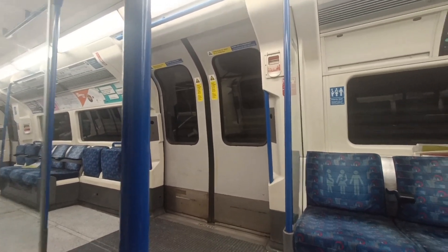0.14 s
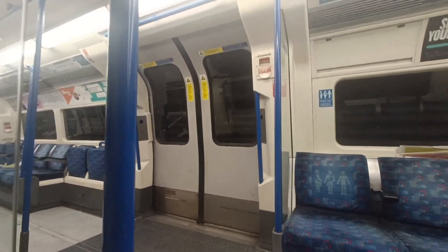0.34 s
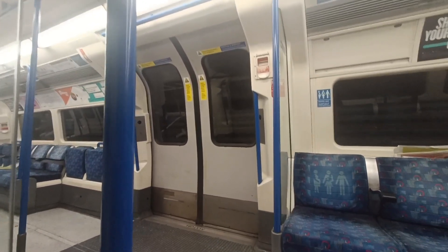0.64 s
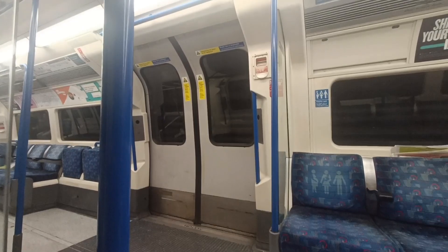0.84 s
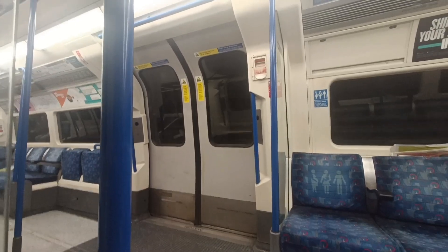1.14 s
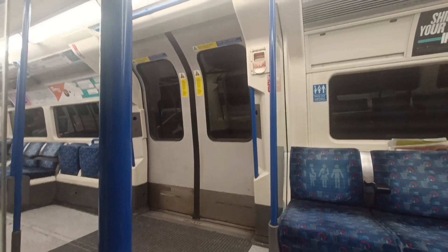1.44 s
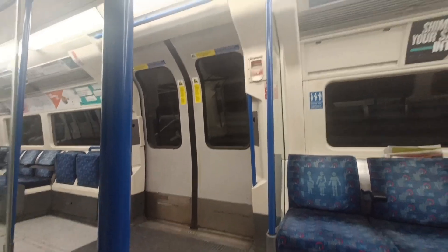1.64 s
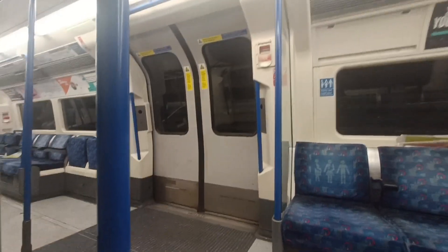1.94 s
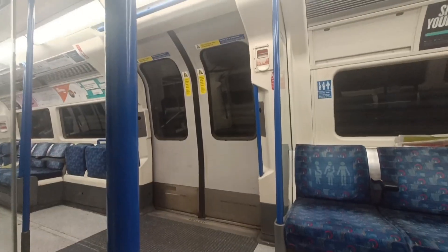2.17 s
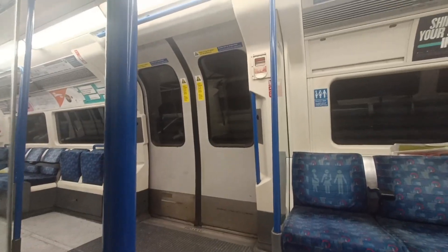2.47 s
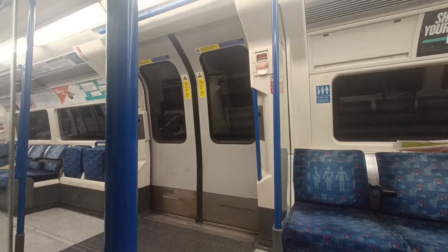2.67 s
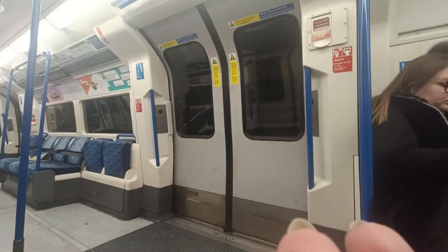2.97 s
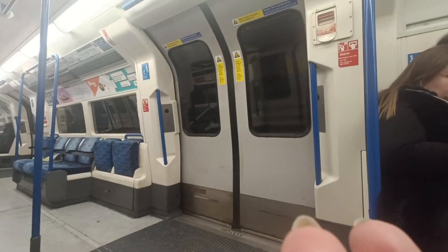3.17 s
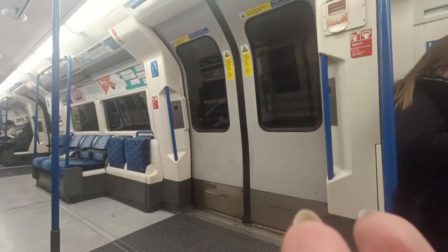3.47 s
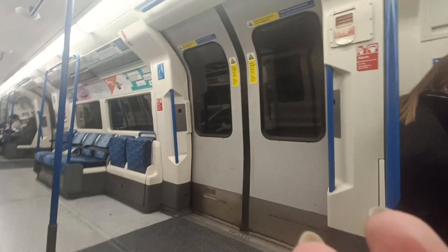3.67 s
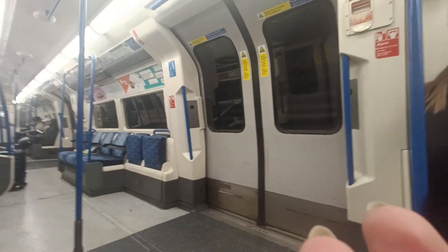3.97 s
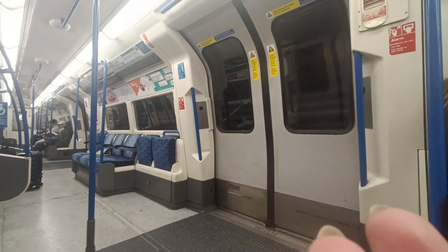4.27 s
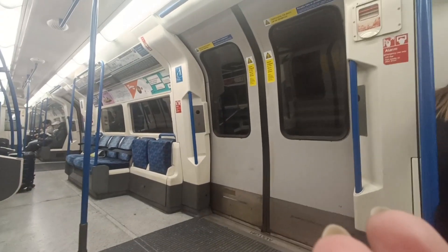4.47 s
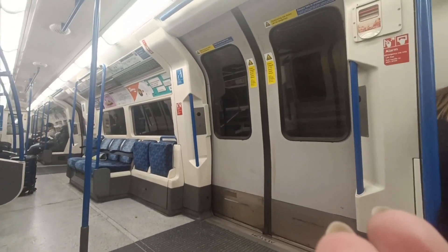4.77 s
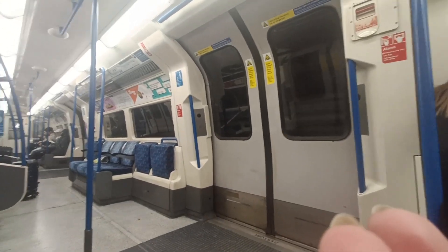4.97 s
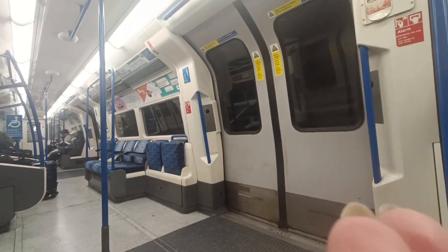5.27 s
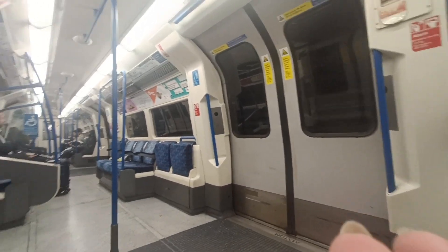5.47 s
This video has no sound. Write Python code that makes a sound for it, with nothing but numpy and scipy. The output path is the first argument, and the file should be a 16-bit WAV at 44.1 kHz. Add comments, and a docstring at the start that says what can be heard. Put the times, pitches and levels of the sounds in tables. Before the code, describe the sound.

A subway train booms and rumbles loudly through a tunnel, heard from inside the carriage. A gear whine slowly climbs while the wheels knock over rail joints and faintly scrape. The sound cuts to dead silence for half a second, then returns a little brighter, with loose door panels rattling and the wheels scraping and squealing toward the right. Near the end the wheels hum, and two small clicks come close on the left.

```python
"""An underground train booms, rumbles and roars through a tunnel, heard from inside as rough rail
shakes its wheels and body. There are two stretches of the ride, with dead silence between them.
In the first a gear whine slowly climbs; in the second the wheels squeal and hum, and something
clicks close by on the left. In both, rail joints knock, steel scrapes on the rail now and then,
and loose door panels rattle."""
import sys
import numpy as np
from scipy import signal
from scipy.fft import rfft, irfft, next_fast_len
from scipy.io import wavfile
from scipy.ndimage import uniform_filter1d, minimum_filter1d

SR = 44100
rng = np.random.default_rng(int(sys.argv[2]) if len(sys.argv) > 2 else 0)


def master_out(mix):
    """Clip the mix to full scale and print it as 16-bit PCM to the path in sys.argv[1]."""
    frames = np.transpose(np.atleast_2d(mix))
    ceiling = np.clip(frames, -1, 1)
    pcm = np.round(ceiling * 32767).astype(np.int16)
    wavfile.write(sys.argv[1], SR, pcm)


N = 247842
TIME = np.arange(N) / SR
FFT_SIZE = next_fast_len(N)
HZ = np.maximum(np.arange(FFT_SIZE // 2 + 1) * SR / FFT_SIZE, 1)
SIDES = np.array([[1], [-1]])   # left, right
FIRST, SECOND = 0, 1   # the two stretches


def from_db(db):
    """Turn decibels into a gain to multiply by."""
    return 10 ** (np.asarray(db) / 20)


def rms_one(x):
    """Scale a signal so that its average strength (rms) is 1."""
    return x / np.sqrt(np.mean(x ** 2) + 1e-20)


def over_time(rows):
    """Join the points of a table with lines: one curve for each column after the time."""
    times, *columns = np.transpose(rows)
    return [np.interp(TIME, times, column) for column in columns]


def over_frequency(points):
    """Join (frequency, value) points with lines, giving every octave equal room."""
    hz, value = np.transpose(points)
    return np.interp(np.log(HZ), np.log(hz), value)


def during(start_s, end_s):
    """1 between start and end, 0 outside, with abrupt edges."""
    return np.clip(np.minimum(TIME - start_s, end_s - TIME) / .001, 0, 1)


def envelope(start_s, length_s, attack_s, release_s):
    """Rise to 1 by the start time, hold, then die away."""
    early = np.maximum(start_s - TIME, 0)
    late = np.maximum(TIME - start_s - length_s, 0)
    return np.exp(-np.minimum((early / attack_s) ** 2 + late / release_s, 50))


def pan(balance_db):
    """Left and right gains with the same total power; a positive balance leans left."""
    gains = from_db(SIDES * balance_db / 2)
    return gains / np.sqrt(np.mean(gains ** 2, axis=0))


def white_spectra():
    """The spectra of two unrelated white noises."""
    return rfft(rng.standard_normal((2, FFT_SIZE)))


def drift(rate_hz):
    """A smooth random wander, about 1 in size; a higher rate wanders faster."""
    step, warm_up = 40, 1000
    keep = np.exp(-2 * np.pi * step * rate_hz / SR)
    noise = rng.standard_normal(N // step + warm_up + 2)
    slow = signal.lfilter([1], [1, -2 * keep, keep * keep], noise)[warm_up:]
    return np.interp(np.arange(N) / step, np.arange(len(slow)), rms_one(slow))


def band(low_hz, high_hz):
    """Gains that let through only the frequencies between low and high."""
    return ((1 + (low_hz / HZ) ** 12) * (1 + (HZ / high_hz) ** 12)) ** -.5


def resonance(hz, width_hz):
    """Gains that peak at 1 on one frequency and fall away on both sides."""
    return 1 / (1 + ((HZ - hz) / width_hz) ** 2)


def ring(hits, hz, ring_s):
    """Each hit starts a sine wave that fades by 60 dB in the ring time."""
    keep = from_db(-60 / (ring_s * SR))
    angle = 2 * np.pi * hz / SR
    return signal.lfilter([0, np.sin(angle)], [1, -2 * keep * np.cos(angle), keep * keep], hits + 1e-18)


def scattered_tone(phase, width_hz):
    """A tone that takes many paths through the car, so it fades in and out differently on each side."""
    step = 512
    points = np.arange(0, N + step, step)
    keep = np.exp(-2 * np.pi * width_hz * step / SR)
    paths = rng.standard_normal((2, len(points) + 40, 2)) @ [1, 1j]
    fades = signal.lfilter([1], [1, -2 * keep, keep * keep], paths)[:, -len(points):]
    fades = np.array([np.interp(np.arange(N), points, side) for side in fades])
    return rms_one((fades * np.exp(1j * phase)).real)


def swells(rows):
    """Bursts of noise, each around one pitch, that smoothly rise and fall."""
    out = np.zeros(N)
    for middle_s, half_length_s, hz, width_hz, level_db in rows:
        bell = np.exp(-np.minimum(((TIME - middle_s) / half_length_s) ** 2, 50))
        spectrum = rfft(rng.standard_normal(FFT_SIZE)) * resonance(hz, width_hz)
        burst = bell * irfft(spectrum, FFT_SIZE)[:N]
        out += from_db(level_db) * burst * np.sqrt(np.sum(bell ** 2) / np.sum(burst ** 2))
    return out


def cabin_echo(x, ring_s):
    """Many quick echoes off the walls smear a sound, differently on each side."""
    tail = rng.standard_normal((2, SR // 4)) * from_db(-60 * TIME[:SR // 4] / ring_s)
    return signal.fftconvolve(x, tail, axes=1)[:, :N]


def cabin_noise(colour_db, balance_db, band_hz, flutter_db, flutter_hz):
    """Noise that fills the car from all around: even in the long run, but fluttering quickly."""
    # how alike left and right are; long waves reach both alike: (frequency [Hz], likeness [-1 to 1])
    likeness = [(60, 0.99), (130, 0.98), (290, 0.9), (640, 0.55), (1000, 0.17), (1400, -0.22), (3000, 0.11),
                (15000, -0.12)]
    alike = np.clip(over_frequency(likeness), -1, 1)
    middle, side = white_spectra()
    spectrum = np.sqrt(1 + alike) * middle + np.sqrt(1 - alike) * side * SIDES
    noise = irfft(spectrum * pan(balance_db) * from_db(colour_db) * band(*band_hz), FFT_SIZE)[:, :N]
    strength = np.sqrt(uniform_filter1d(noise.mean(axis=0) ** 2, size=SR // 12) + 1e-20)
    noise = noise / strength * from_db(flutter_db * drift(flutter_hz))
    return noise / np.sqrt(np.mean(noise.mean(axis=0) ** 2))


def jolts():
    """The wheels jolt over joints and dips, adding thump [dB], clatter [dB] and panel shaking [gain]."""
    # bumps in the rail: (time [s], length [s], thump boost [dB], clatter boost [dB], rattle level [dB])
    bumps = [(0.025, 0.044, -0.5, -1, -59), (1.013, 0.075, 5, 3.5, -61), (1.424, 0.044, 3, 2.5, -41),
             (1.547, 0.053, 1, 2.5, -61), (2.557, 0.048, 2, 3.5, -53), (2.668, 0.012, 1.5, 2, -57),
             (3.243, 0.041, 0, 1, -37), (3.384, 0.038, 0.5, 2.5, -32), (3.681, 0.024, 5, 0, -39),
             (3.916, 0.047, 1.5, 3, -53), (4.192, 0.05, 1, 1.5, -33.5), (4.328, 0.037, 3, 1.5, -54),
             (4.53, 0.031, 2, -1, -49), (4.735, 0.079, 2, -0.5, -55), (5.121, 0.054, 3, 0.5, -58),
             (5.379, 0.048, 2, 4.5, -31.5)]
    thump_db = clatter_db = shake = 0
    for start_s, length_s, thump, clatter, rattle_db in bumps:
        jolt = envelope(start_s, length_s, attack_s=0.014, release_s=0.01)
        thump_db += thump * jolt
        clatter_db += clatter * jolt
        shake += from_db(rattle_db) * jolt
    return thump_db, clatter_db, shake


def rubbing():
    """How hard a wheel's rim (its flange) rubs the rail over time; between rubs it barely grazes."""
    # rubs on the rail: (time [s], length [s], level [dB])
    rubs = [(0.577, 0.26, -54), (1.292, .04, -50.5), (1.363, 0.075, -46.5), (1.553, 0.1, -60),
            (3.238, 0.053, -42.5), (3.564, 0.16, -44), (3.897, 0.044, -44), (4.128, 0.043, -41),
            (4.201, 0.02, -31), (4.562, 0.072, -44.5), (5.19, .03, -61), (5.373, 0.27, -50)]
    grazing_db = -67
    return from_db(grazing_db) + sum(
        from_db(db) * envelope(s, length, attack_s=0.02, release_s=0.11) for s, length, db in rubs)


def squeaks():
    """Tiny high squeaks come and go."""
    # squeaks: (middle [s], half length [s], pitch [Hz], width [Hz], level [dB])
    bursts = [(1.31, .035, 9400, 700, -63), (1.32, .025, 14000, 500, -66), (1.38, 0.078, 6940, 160, -54),
              (1.43, 0.036, 12900, 2500, -63), (1.795, 0.0033, 14000, 900, -58),
              (4.119, .012, 11850, 260, -49)]
    return swells(bursts)


def close_clicks():
    """A small thing clicks close by on the left, with no bass; the walls echo it faintly."""
    # light touches: (time [s], strength [dB])
    touches = [(5.4095, -11.5), (5.4584, -6.7)]
    # the notes the thing rings with: (pitch [Hz], level [dB], ring time [s])
    notes = [(1050, -2, .004), (1600, -1, .004), (2270, -4, .0055), (4100, -12, .003), (6400, -15, .002),
             (9300, -3, .0018), (13200, -6, .0015)]
    hardest_db = max(db for _, db in touches)
    taps = np.zeros(N)
    for time_s, level_db in touches:
        top_hz = 5200 * from_db(level_db - hardest_db) ** 1.5   # a lighter touch is duller
        contact = signal.butter(2, [700, top_hz], "band", fs=SR, output="sos")
        tap = from_db(level_db) * signal.unit_impulse(N, int(time_s * SR))
        taps += signal.sosfilt(contact, tap + 1e-18)
    rings = sum(from_db(db) * ring(taps, hz, ring_s) for hz, db, ring_s in notes)
    return pan(balance_db=22) * rings + from_db(-37) * cabin_echo(np.array([rings, rings]), ring_s=.13)


def panel_rattle(jolt_shake, knocks_per_s, spread_db, idle_db):
    """Loose door panels knock unevenly, hardest on the jolts; each knock mixes their notes anew."""
    # the notes of a door panel: (pitch [Hz], level [dB], ring time [s])
    notes = [(840, -4, 0.021), (1082, 7.5, 0.019), (1540, -4, 0.017), (1820, -4, 0.035), (2390, -3, 0.05),
             (3220, -5, 0.0073), (3710, -3.5, 0.018), (4160, 4, 0.0041)]
    shake = from_db(idle_db + 1.2 * drift(2.8)) + jolt_shake
    knocks = (rng.random(N) < knocks_per_s / SR) * from_db(spread_db * rng.random(N))
    rings = sum(from_db(db) * ring(knocks * (rng.random((2, N)) - .5), hz, ring_s)
                for hz, db, ring_s in notes)
    softened = signal.sosfilt(signal.butter(2, 5500, fs=SR, output="sos"), rings)
    return shake * rms_one(cabin_echo(softened, ring_s=0.039))


def gear_whine(width_hz, direct_db, scattered_db):
    """Meshing gear teeth whine higher as speed grows, heard through the floor and scattered by the car."""
    # the main whine: (time [s], pitch [Hz], level [dB])
    whine = [(0, 1588, -48), (.25, 1590, -50), (.42, 1590, -45.5), (.75, 1582, -52), (.95, 1586, -50),
             (1.1, 1592, -44.5), (1.3, 1600, -52), (1.5, 1610, -47), (1.7, 1626, -46.5),
             (1.95, 1644, -40.5), (2.04, 1648, -44), (2.18, 1652, -43), (2.3, 1656, -48),
             (2.7, 1662, -45.5)]
    # weaker tones that climb with it: (pitch multiple [times], level [dB])
    weaker_tones = [(.842, -1.5), (1.065, -9.5), (2, -15)]
    waver_hz, flutter_db = 5, 1.5
    hz, level_db = over_time(whine)
    phase = 2 * np.pi * np.cumsum(hz + waver_hz * drift(rate_hz=20)) / SR
    direct = from_db(direct_db) * np.sin(phase + rng.uniform(0, 2 * np.pi, (2, 1)))
    scattered = from_db(scattered_db) * scattered_tone(phase, width_hz)
    others = sum(from_db(db) * scattered_tone(times * phase, width_hz) for times, db in weaker_tones)
    return from_db(level_db + flutter_db * drift(rate_hz=20)) * (direct + scattered + others)


def steel_scrape(stretch, rub, judder_db):
    """Jerky rubbing makes the steel ring: further off in the first stretch, near in the second."""
    # where the steel rings: (pitch [Hz], width [Hz], level [dB], left minus right [dB])
    far_steel = [(2440, 160, 3, -1.5), (6500, 590, -0.5, -4.5), (6720, 350, -1, -1),
                 (8000, 530, -11.5, -5.5), (9500, 900, -21.5, 5.5), (12500, 3400, -15.5, -0.5)]
    near_steel = [(1950, 1100, 4, 2), (3160, 280, 0, -1), (4070, 270, -5, 1), (4860, 290, -1.5, -9),
                  (6670, 140, -1, -25), (7020, 140, -4.5, -20), (7770, 200, -14, -14), (8660, 1200, -9, -8),
                  (11500, 600, -10, -3), (12400, 900, -14, -10), (14000, 1500, -11.5, -18)]
    power = 0
    for hz, width_hz, level_db, balance_db in (far_steel, near_steel)[stretch]:
        shape = resonance(hz, width_hz) ** 2 / width_hz
        power += shape * (from_db(level_db) * pan(balance_db)) ** 2
    friction = irfft(white_spectra() * np.sqrt(power), FFT_SIZE)[:, :N]
    return rub * rms_one(friction * from_db(judder_db * drift(55)))


def wheel_squeal(rub, width_hz, lag_s):
    """Rubbing sets the wheel singing; the squeal lags behind the rub but grows more steeply."""
    # the notes of the wheel: (pitch [Hz], level [dB], left minus right [dB])
    notes = [(3058, -12, 0), (3709, -10, -2), (4307, -11, -2), (4660, -6, -4), (4694, 1.5, -4),
             (4785, -7, -4), (4860, -8, -4), (6585, -6.5, -18), (6622, -4, -18), (6708, -4.5, -18),
             (7090, -7, -18), (7376, -15, -18), (7890, -14, -9), (11094, -21, -4), (11394, -20, -4)]
    hard_rub_db, growth = -28, 2.3
    keep = np.exp(-1 / (lag_s * SR))
    drive = signal.lfilter([1 - keep], [1, -keep], rub) / from_db(hard_rub_db)
    singing = sum(from_db(db) * pan(balance_db) * scattered_tone(2 * np.pi * hz * TIME, width_hz)
                  for hz, db, balance_db in notes)
    return from_db(-34) * drive ** growth * singing


def wheel_hum(start_s, length_s, hz, level_db, waver_hz, flutter_db):
    """A long run of evenly rippled rail makes the wheels hum on one unsteady pitch."""
    phase = 2 * np.pi * np.cumsum(hz + waver_hz * drift(9.3)) / SR
    fade = envelope(start_s, length_s, attack_s=0.14, release_s=0.14)
    return fade * from_db(level_db + flutter_db * drift(11)) * rms_one(np.sin(phase))


def drones_and_flares():
    """Brief low drones and booms swell in the car, and twice a noisy flare roughens the gear whine."""
    # drones, booms and flares: (middle [s], half length [s], pitch [Hz], width [Hz], level [dB])
    bursts = [(.15, .3, 224.5, 16, -25), (.38, 0.021, 1590, 63, -37.5), (.56, 0.051, 112, 5, -16),
              (.63, 0.027, 269, 14, -13), (.68, 0.013, 160, 14, -9.5), (.745, 0.034, 244, 19, -16),
              (.868, 0.022, 141, 20, -15), (.94, 0.05, 117, 6.5, -20.5), (1.048, 0.019, 622, 25, -27.5),
              (1.17, 0.042, 134, 9.6, -14.5), (1.3, 0.54, 554, 82, -33), (1.6, 0.16, 371, 35.6, -24.5),
              (1.84, 0.033, 113.8, 11, -11.5), (2.41, 0.041, 347, 15, -22), (2.56, 0.049, 135, 20, -17),
              (2.6, 0.12, 1710, 90, -44), (3.28, 0.029, 214, 25, -12.5), (3.45, 0.032, 139, 15, -20),
              (3.47, 0.16, 805, 71, -28.5), (3.58, 0.22, 214, 42, -22), (3.79, 0.036, 225, 7.2, -18),
              (3.96, 0.045, 140, 32, -16), (3.96, .035, 570, 120, -27), (4.055, 0.054, 133, 7.6, -12.5),
              (4.35, 0.048, 239, 9.9, -18.5), (4.35, 0.02, 120, 18, -18.5), (4.74, 0.04, 116, 20, -12),
              (5.345, 0.033, 360, 21, -18.5), (5.395, .03, 520, 100, -23)]
    return swells(bursts)


def joint_knocks():
    """A blow at a rail joint rings the wheel frame, heard through the floor and again off the walls."""
    # joints that a wheel hits squarely: (time [s], strength [dB])
    joints = [(.915, -25), (1.019, -23), (1.043, -21.5), (1.545, -27), (3.399, -29), (4.346, -28.5),
              (5.389, -27)]
    # the notes of the wheel frame: (pitch [Hz], level [dB], ring time [s])
    notes = [(286, 3.5, 0.15), (339, -9, 0.68), (521, -3.5, 0.05), (590, -2.5, 0.098), (816, -5.5, 0.068),
             (1070, -8.5, 0.093), (1316, -10.5, 0.13)]
    blows = np.zeros(N)
    for time_s, level_db in joints:
        blows[int(time_s * SR)] = from_db(level_db)
    softened = signal.sosfilt(signal.butter(2, 1500, fs=SR, output="sos"), blows + 1e-18)
    rings = sum((-1) ** k * from_db(db) * ring(softened, hz, ring_s)
                for k, (hz, db, ring_s) in enumerate(notes))
    return rings + from_db(-29) * cabin_echo(np.array([rings, rings]), ring_s=0.18)


def running_noise(stretch, thump_db, clatter_db):
    """Rough rail shakes the car body and floor; the wheels roar, and hiss where they slide."""
    # roughness of the rail, in the first and second stretch: (time [s], level [dB])
    rail_1 = [(0, 3), (.25, -2), (.42, 1.5), (.65, 1), (.78, -0.8), (.9, -3), (.99, -2), (1.1, -1),
              (1.25, 0), (1.55, 0), (1.73, -1), (1.95, 1), (2.1, -1.1), (2.26, -4), (2.48, -2), (2.7, -3)]
    rail_2 = [(3.19, 2), (3.45, 2.5), (3.84, -1), (4.0, 1.5), (4.3, 1), (4.48, -0.5), (4.7, 1.5),
              (5.05, -1.5), (5.3, -2), (5.52, 1.2), (5.62, -1)]
    # levels on average rail: (shudder [dB], boom [dB], floor [dB], roar [dB], hiss [dB])
    levels_1 = (-26.5, -19.5, -19.5, -29.5, -45.5)
    levels_2 = (-32, -23.5, -20.5, -27, -43.5)
    # tone colour of the car body, the wheels and the hiss: (frequency [Hz], level [dB])
    body_1 = [(12, -56), (20, -45), (54, -17), (81, -14), (123, -0.5), (208, -4), (236, -8.5), (268, -6),
              (315, -7), (346, -8), (419, -14.5), (454, -15.5), (541, -17), (743, -36.5), (900, -29),
              (1170, -64.5), (1980, -120)]
    body_2 = [(12, -47), (20, -19), (49, -1.5), (75, 4), (123, -1), (177, -5), (215, -4), (286, -7),
              (381, -7), (468, -12), (567, -16.5), (900, -38), (1170, -46), (1980, -120)]
    wheels_1 = [(210, -34), (350, 5), (450, -11), (540, -11), (742, -19), (1350, -23.5), (1470, -25),
                (1620, -22), (1870, -28), (2360, -31.5), (3500, -40), (4550, -68.5), (7700, -120)]
    wheels_2 = [(210, -7), (350, 7), (382, -6), (481, -3), (550, -4.5), (794, -8.5), (1070, -14),
                (1480, -15), (1680, -19.5), (1960, -22), (3500, -40), (4550, -77), (7700, -120)]
    hiss_1 = [(2000, 6.5), (2450, -0.5), (2900, -6.5), (3900, -10), (4500, -16), (5400, -17.5), (6300, -15),
              (6900, -15.5), (7400, -21.5), (8100, -25), (8800, -33.5), (10500, -36.5), (11700, -34.5),
              (15500, -44)]
    hiss_2 = [(2000, 5), (2900, -5), (3900, -8), (4500, -11), (5100, -13.5), (5600, -16.5), (6200, -14),
              (6900, -14.5), (7600, -21), (8500, -30.5), (10200, -31), (11700, -31), (13000, -32),
              (15500, -37)]
    # steady notes of the car: (pitch [Hz], width [Hz], boost [dB])
    notes_1 = [(111.9, 8.9, 3.5), (358.8, 6.3, 4), (410, 17, 5)]
    notes_2 = [(135, 2.9, 6.5), (211, 3.3, 1.1)]
    # which side is louder: (frequency [Hz], left minus right [dB])
    balance_1 = [(100, 0), (200, 1), (400, 0), (700, -1.5), (1300, 0), (3000, 0), (5000, -2), (6000, -7.5),
                 (6900, -3), (8200, 3.5), (15000, -1)]
    balance_2 = [(100, 1), (400, 0.5), (700, 1.5), (2400, 1.5), (4000, 1.5), (5000, -6), (6000, -14),
                 (6900, -22), (8200, -8), (9800, -2), (12000, -2), (13200, -11), (15000, -17)]
    # the car heaves on its springs and the shudder swells: (time [s], length [s], boost [dB])
    heaves = [(0.033, 0.017, 8), (0.14, 0.1, 7), (0.41, 0.11, 4), (0.618, .03, 2.5), (0.797, 0.15, 2.5),
              (1.07, 0.0305, 6), (1.46, 0.26, 1.5), (1.828, .03, 5.5), (1.93, 0.054, 3), (2.407, 0.038, 4),
              (3.259, 0.04, 10), (3.42, .15, 3.5), (4.078, .03, 7)]
    if stretch == FIRST:
        rail, levels, notes, curves = rail_1, levels_1, notes_1, (body_1, wheels_1, hiss_1, balance_1)
    else:
        rail, levels, notes, curves = rail_2, levels_2, notes_2, (body_2, wheels_2, hiss_2, balance_2)
    car_colour, wheel_colour, hiss_colour, balance = map(over_frequency, curves)
    car_colour += sum(db * resonance(hz, width_hz) for hz, width_hz, db in notes)
    shudder = cabin_noise(car_colour, balance, band_hz=(22.6, 78.8), flutter_db=1.4, flutter_hz=10)
    boom = cabin_noise(car_colour, balance, band_hz=(89, 177), flutter_db=1.2, flutter_hz=14)
    floor = cabin_noise(car_colour, balance, band_hz=(161, 497), flutter_db=1.02, flutter_hz=33)
    roar = cabin_noise(wheel_colour, balance, band_hz=(471, 2434), flutter_db=-0.32, flutter_hz=31)
    hiss = cabin_noise(hiss_colour, balance, band_hz=(2410, 18000), flutter_db=0.8, flutter_hz=29)
    shudder_db, boom_db, floor_db, roar_db, hiss_db = levels
    rough_db, = over_time(rail)
    heave_db = sum(db * envelope(s, length, attack_s=0.01, release_s=0.068) for s, length, db in heaves)
    # each layer follows the roughness and the bumps by its own share
    return (from_db(shudder_db + 0.18 * rough_db + heave_db) * shudder
            + from_db(boom_db + 0.89 * rough_db + thump_db) * boom
            + from_db(floor_db + 0.75 * rough_db + 0.7 * thump_db) * floor
            + from_db(roar_db + rough_db + clatter_db) * roar
            + from_db(hiss_db + rough_db + 0.66 * clatter_db) * hiss)


def scene():
    """Two stretches of one ride; the second is brighter, with the scraping wheel near on the right."""
    thump_db, clatter_db, shake = jolts()
    rub = rubbing()
    rattle = panel_rattle(shake, knocks_per_s=260, spread_db=-2.5, idle_db=-51)
    small_sounds = rattle + joint_knocks() + drones_and_flares() + squeaks()
    first = (running_noise(FIRST, thump_db, clatter_db)
             + steel_scrape(FIRST, rub, judder_db=2)
             + gear_whine(width_hz=19, direct_db=0.5, scattered_db=-2))
    second = (running_noise(SECOND, thump_db, clatter_db)
              + steel_scrape(SECOND, rub, judder_db=-0.5)
              + wheel_squeal(rub, width_hz=20, lag_s=0.02)
              + wheel_hum(start_s=4.45, length_s=.9, hz=386, level_db=-30.3, waver_hz=8.1, flutter_db=4)
              + close_clicks())
    return during(0, 2.711) * (first + small_sounds) + during(3.187, 5.63) * (second + small_sounds)


def record(dry):
    """A limiter briefly turns down the biggest peaks, and the highest treble is cut off steeply."""
    limit_db, cutoff_hz, window = -1.8, 15250, SR // 100
    allowed_gain = np.minimum(1, from_db(limit_db) / (np.abs(dry).max(axis=0) + 1e-9))
    gain = uniform_filter1d(minimum_filter1d(allowed_gain, size=window), size=window)
    return signal.sosfilt(signal.ellip(10, .1, 80, cutoff_hz, fs=SR, output="sos"), dry * gain)


dry = scene()
out = record(dry)
master_out(out)
```